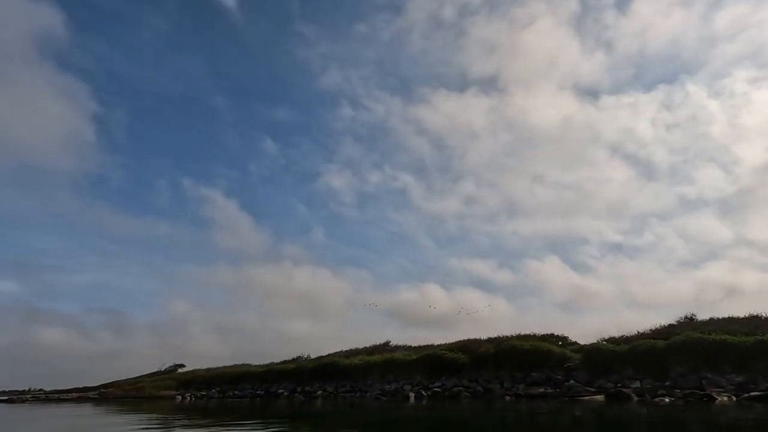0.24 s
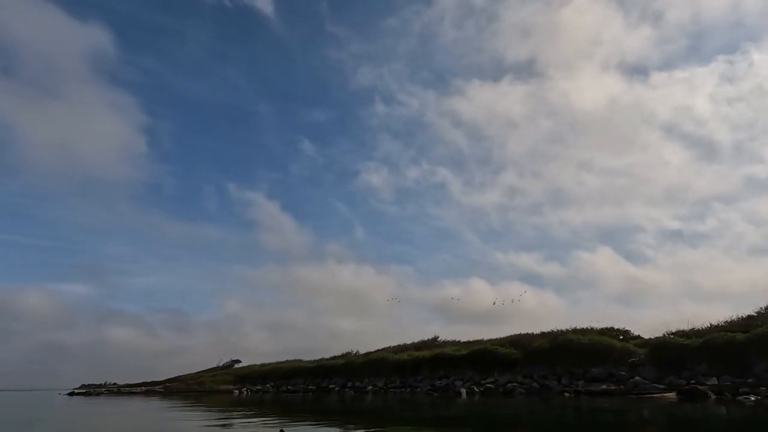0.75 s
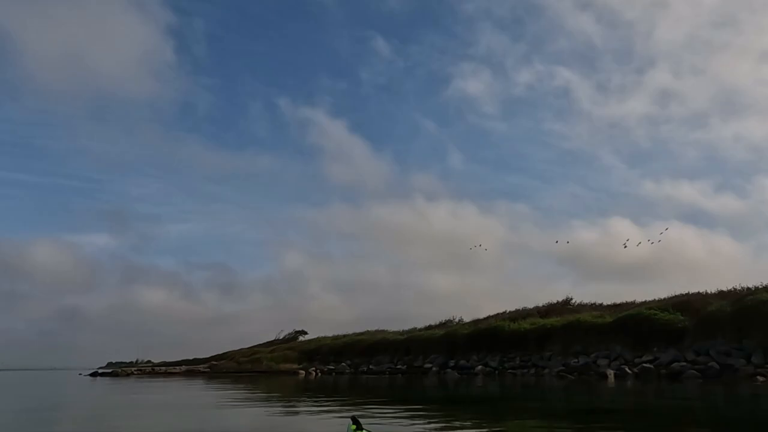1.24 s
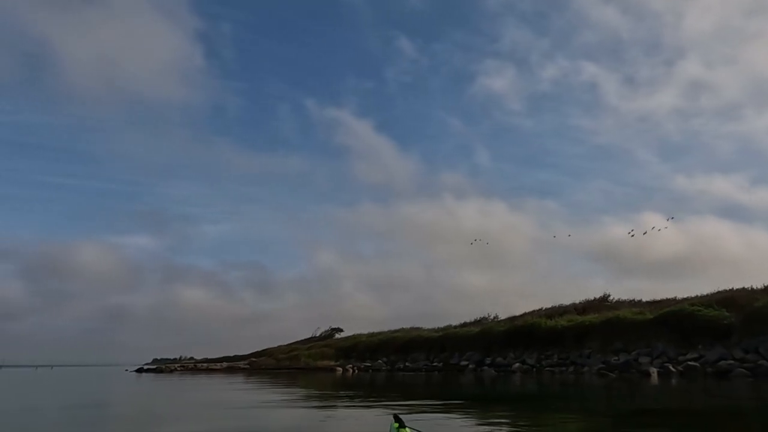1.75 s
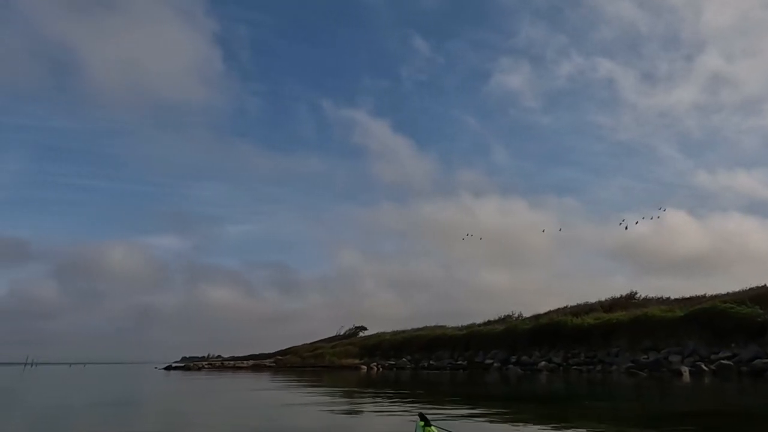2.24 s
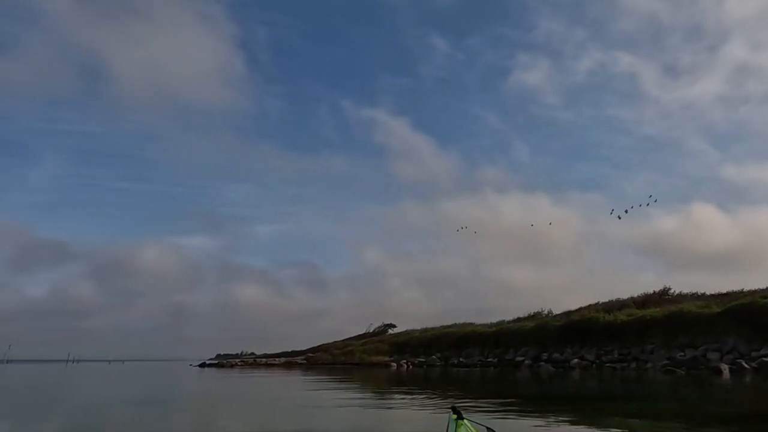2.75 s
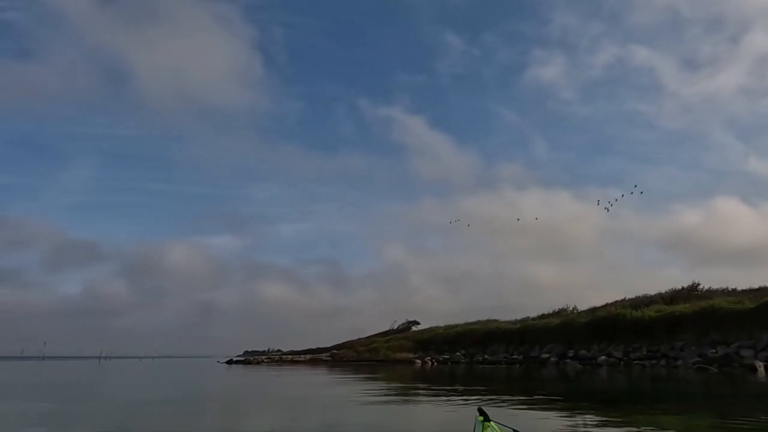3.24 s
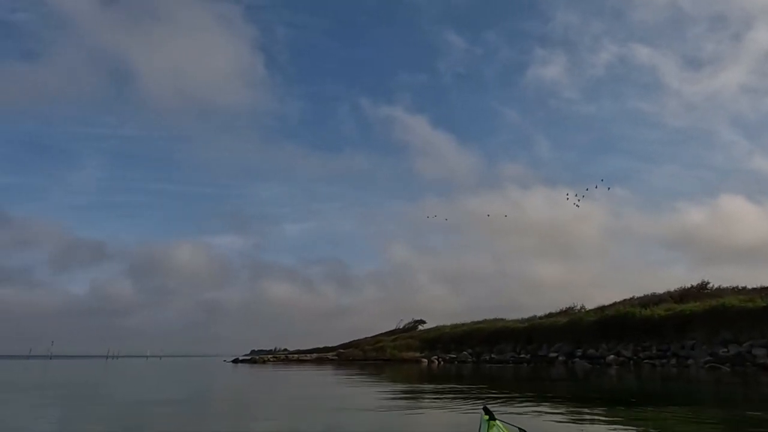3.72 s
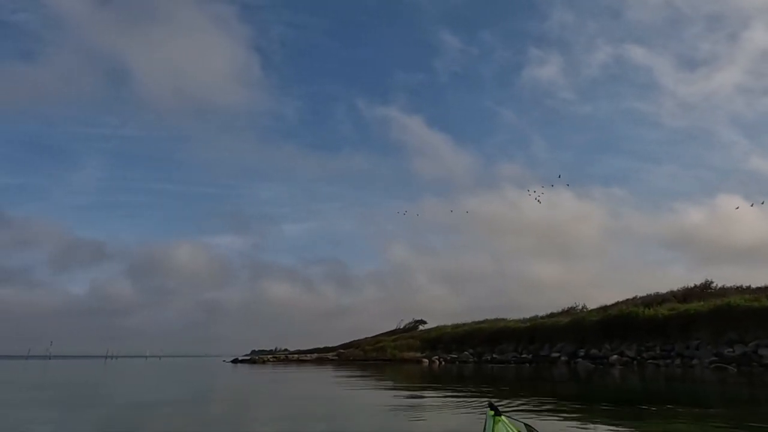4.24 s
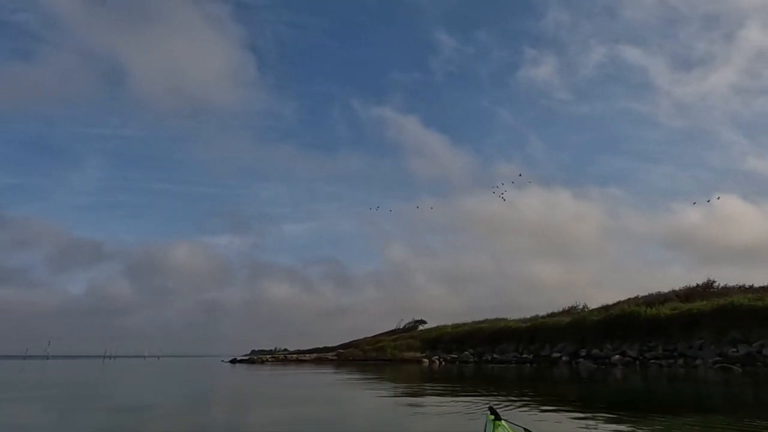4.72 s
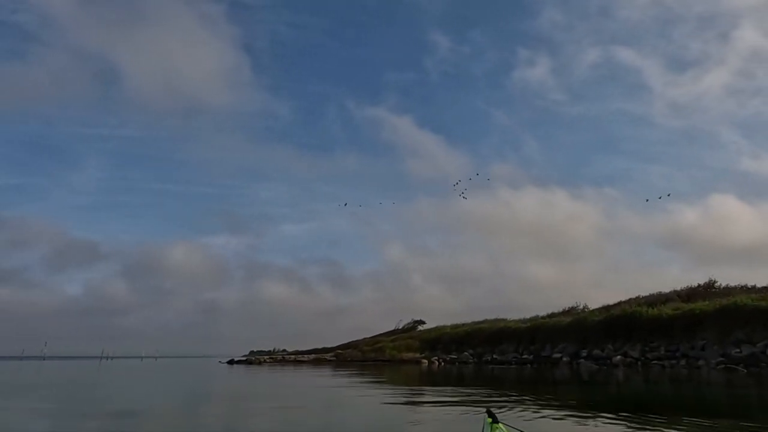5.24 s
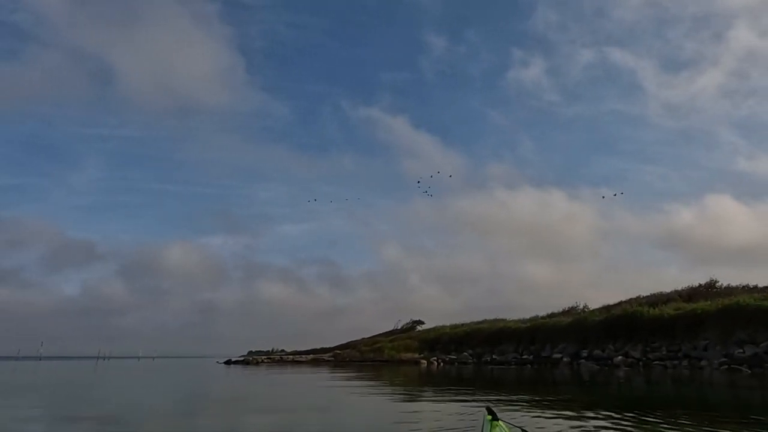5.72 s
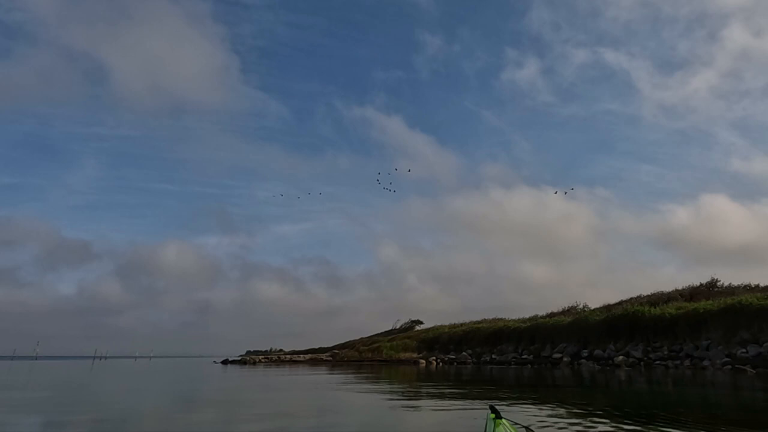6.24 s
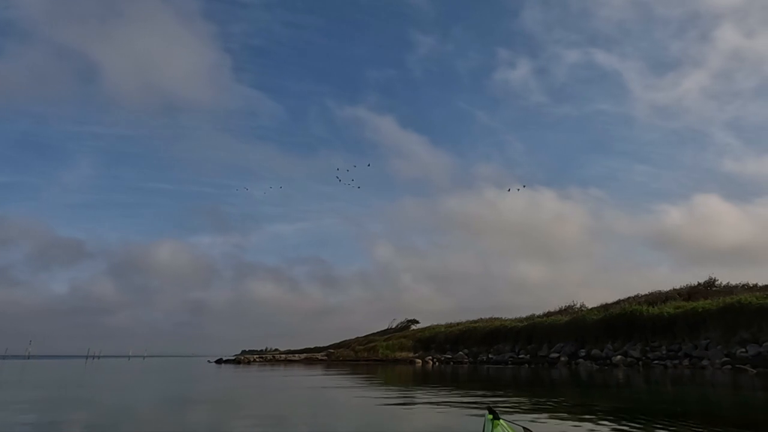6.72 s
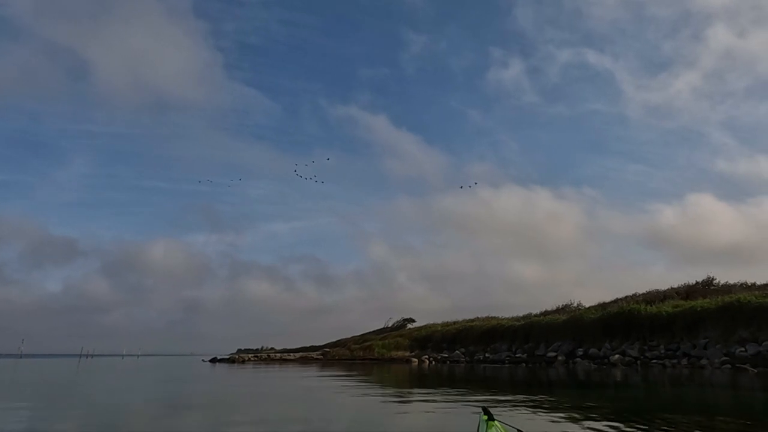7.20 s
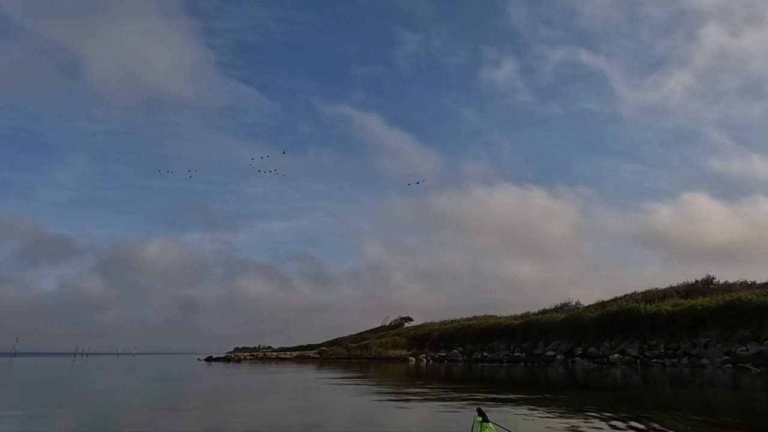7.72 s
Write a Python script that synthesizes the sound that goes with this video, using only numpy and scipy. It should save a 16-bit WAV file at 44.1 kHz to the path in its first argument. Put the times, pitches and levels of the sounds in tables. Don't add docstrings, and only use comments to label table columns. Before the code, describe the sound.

Outdoors on calm water by a low bank, a flock of geese flies past, giving short hoarse honks and higher yelps ahead and to the left over a blurred distant chorus. Heavy wind thumps hit the stereo microphone in the first second, then ease to soft rumbling. Calls come in uneven clusters. Late on, nearby cloth rubs, small gear ticks, and another strong gust arrives.

```python
import sys
import numpy as np
from scipy import signal
from scipy.fft import rfft, irfft, next_fast_len
from scipy.io import wavfile
from scipy.ndimage import uniform_filter1d

SR = 44100
rng = np.random.default_rng(int(sys.argv[2]) if len(sys.argv) > 2 else 0)


def put_to_file(sound):
    columns = np.atleast_2d(sound).T
    safe = np.clip(columns, -1, 1)
    whole_steps = np.round(safe * 32767)
    wavfile.write(sys.argv[1], SR, whole_steps.astype(np.int16))


def invert_db(x):
    u = np.asarray(x, float) / 20
    return 10 ** u


N = 351036

# [Hz, dB per Hz]
AIR_SPECTRUM = [(40, -18), (70, -4.5), (110, -6), (210, -1), (330, -11), (550, -22), (1000, -10),
                (2500, -25.5), (4200, -30), (7600, -39), (8200, -50), (11000, -52.5), (15000, -73.5)]
# [Hz, 0-1]
AIR_COHERENCE = [(60, 1), (250, 0.93), (500, 0.61), (1000, 0.19), (4000, 0.22), (8000, 0.17)]
AIR_DB = -56
DRONE_HZ, DRONE_WIDTH_HZ, DRONE_DB = 192, 59, -61

# [s, dB, s, dB]
GUSTS = [(0.0, -30.5, 0.17, -5.5), (0.18, -29, 0.049, 7.5), (0.35, -26.5, 0.15, -16),
         (0.66, -34, 0.19, 1.5), (0.9, -36, 0.48, -11.5), (1.35, -41.5, 0.23, -7), (1.72, -32, 0.41, -11),
         (2.08, -35.5, 0.22, -10.5), (2.75, -39, 0.25, -18), (3.3, -51, 1, -10), (3.88, -37.5, 0.088, -5),
         (4.97, -36, 0.31, -4), (5.56, -37.5, 0.14, -8), (5.95, -47, 0.96, -11), (6.42, -34.5, 0.15, -12),
         (6.65, -51, 0.13, 9.5), (7.35, -44, 0.38, -5), (7.71, -25, 0.13, -13.5), (7.87, -37.5, 0.17, -27)]
# [s, dB, Hz, dB, s]
SLAPS = [(0.156, -10.5, 77.4, -5, 0.014), (0.171, -23, 99.6, -7, 0.015), (0.224, -19.5, 147, -4, 0.023),
         (0.256, -30.5, 98.5, -26, 0.012), (0.587, -22, 210, -10, 0.039), (0.611, -17, 197, -8.5, 0.035),
         (0.646, -13, 99.6, 1.5, 0.03), (0.648, -28, 300, -7, 0.0094), (0.716, -18.5, 254, -8.5, 0.014),
         (0.16, -26, 254, -8, 0.012), (0.666, -31, 109, -14, 0.041), (0.715, -10.5, 111, 0, 0.021),
         (0.726, -11.5, 100, -1, 0.027), (1.23, -43.5, 94.2, -9, 0.045), (4.948, -30.5, 88, -9, 0.035),
         (6.324, -27.5, 99, 0, 0.023), (5.549, -37, 72.7, -4, 0.026), (7.715, -20.5, 61.5, 10.5, 0.033),
         (7.779, -32, 102, -7, 0.034), (7.69, -34, 128, -1, 0.023), (5.535, -31, 60, 0, 0.012),
         (3.87, -33, 45, -3, 0.039), (6.27, -41.5, 243, -12, 0.021), (7.86, -22, 73, -8.5, 0.032)]
LULL_DB, LULL_FLUTTER_DB = -54.5, -64
GUST_FLANK_DB = 12.5

# [s, s, dB]
RUBS = [(0.02, 0.051, -62.5), (0.665, 0.4, -63), (7.287, 0.54, -68), (.24, 0.093, -63), (0.351, 0.11, -58),
        (0.553, 0.048, -56.5), (4.75, 0.27, -65.5), (6.69, 0.11, -57), (6.872, 0.11, -60.5),
        (7.013, 0.12, -45.5), (7.176, 0.075, -63)]
# [Hz, dB per Hz]
CLOTH_SPECTRUM = [(100, -18.5), (200, 1.5), (600, -11.5), (1500, -16), (4000, -15), (7600, -20),
                  (8400, -27.5), (12000, -37), (15000, -52)]
# [s, dB, Hz]
TICKS = [(1.1344, -69, 5230), (3.429, -61, 5900), (6.545, -47, 3870), (6.575, -48.5, 7200),
         (6.5904, -44, 5520), (6.6847, -53, 5840), (6.8893, -58, 6030), (7.19, -54, 6000),
         (7.4694, -57, 6560), (7.9229, -51.5, 6470), (7.9444, -59, 5280)]
RUB_ATTACK_DB_PER_S, RUB_SAG_DB_PER_S, RUB_RELEASE_DB_PER_S = 894, 6, 501

# [s, dB]
CHORUS_LEVEL = [(0.0, -46), (0.22, -43.5), (0.82, -48.5), (1.09, -60), (1.62, -48.5), (2.22, -53),
                (3.97, -53), (4.3, -56), (4.75, -50.5), (5.25, -57), (5.52, -55.5), (6.15, -48.5),
                (6.36, -56), (6.47, -68.5), (7.21, -49.5), (7.5, -57.5), (7.96, -63)]
# [Hz, dB]
CHORUS_SPECTRUM = [(700, -15.5), (980, 1.5), (1500, 0), (1900, -6), (2500, -7), (3400, 3), (5000, -12),
                   (8000, -17)]

# start t/s, length/s, level/dB, pitch f/Hz, windpipe resonance spacing f/Hz [s, s, dB, Hz, Hz]
LEFT_HONKS = [(0.1, 0.24, -44.5, 222.7, 1360), (1.43, 0.14, -48.5, 222.3, 1320),
              (1.87, 0.17, -59.5, 223, 1210), (2.12, 0.19, -51.5, 228, 1303),
              (2.55, 0.12, -44.5, 220, 1253), (2.75, 0.14, -53.5, 236.5, 1160),
              (3.2, 0.093, -50.5, 211, 1110), (3.3, 0.095, -46.5, 206, 1137),
              (3.48, 0.093, -51, 209.5, 1145), (3.6, 0.062, -58, 287, 1060), (4.45, 0.4, -54, 233, 1310),
              (5.55, .15, -48, 198, 1160), (5.8, 0.16, -47.5, 206.5, 1410), (6.33, 0.064, -53, 209, 1130),
              (6.88, 0.065, -55.5, 210, 1230), (7.35, .05, -51, 215, 1180), (7.5, 0.11, -50, 229, 1210),
              (7.66, .1, -50, 223, 1174), (7.81, 0.11, -54.5, 215.4, 1244)]
LEFT_YELPS = [(6.205, .07, -46, 1420, 1420), (6.05, .07, -50, 1480, 1480), (0.83, 0.047, -40.5, 1390, 1350),
              (0.89, 0.058, -43, 1506, 1480), (3.0, 0.066, -43.5, 1450, 1500), (1.65, 0.12, -54, 845, 1650),
              (7.385, .1, -53, 790, 1560), (2.97, 0.1, -46, 680, 1430), (3.78, .14, -42.5, 1060, 1180),
              (3.96, 0.081, -49.5, 1050, 1150), (6.57, 0.085, -41.5, 1030, 1030),
              (5.55, .15, -47, 995, 1100), (5.8, .155, -47, 1035, 1035), (1.55, .09, -50, 1500, 1640),
              (2.12, 0.17, -55, 1740, 1720), (6.7, 0.1, -58, 775, 1360)]
RASPS = [(0.15, .05, -57, 225, 1150), (5.825, .125, -60, 200, 1500), (0.081, 0.044, -40, 205.2, 1240),
         (0.24, 0.069, -51, 217.4, 1270), (0.362, 0.026, -45, 229, 1220), (0.817, 0.051, -48, 223.4, 1520),
         (0.88, 0.11, -52.5, 225, 1520), (1.5, 0.085, -61, 213.4, 1130), (1.56, 0.13, -58.5, 226, 1470),
         (1.712, 0.053, -56, 221, 1075), (2.455, 0.11, -53.5, 222, 1175), (2.962, .045, -56, 221.5, 1700),
         (3.783, 0.075, -57, 253, 1150), (3.97, 0.11, -50, 237, 1200), (4.08, 0.053, -56.5, 205, 1030),
         (6.547, 0.04, -52, 203.2, 1136), (6.66, 0.03, -51, 228, 1100)]
HONKS = [(3.0, 0.12, -61, 362, 1430), (3.11, 0.04, -52, 254, 1050), (3.606, 0.046, -49.5, 276, 1143),
         (3.955, 0.13, -50.5, 261.1, 1070), (6.134, 0.075, -45, 219, 1225),
         (6.578, 0.077, -48.5, 205, 1095), (7.245, 0.06, -47.5, 250, 1037)]
SLIDES = [
    (5.328, 0.115, -46, 222, 1170),
    (3.96, .125, -57, 1125, 1690),
]
YELPS = [(0.186, 0.118, -56, 900, 1135), (0.388, 0.052, -55, 892, 1190), (0.56, 0.11, -72, 1038, 1000),
         (3.64, 0.046, -52, 396, 1170), (6.095, 0.025, -55, 735, 1194)]
MUTTERS = [(2.22, 0.12, -60.5, 233.7, 1200), (2.58, 0.21, -60, 230.3, 1375), (4.2, 0.097, -59, 209, 1350),
           (4.82, 0.033, -55.5, 241, 1210)]
FAR_HONKS = [(2.97, 0.081, -49, 222, 1200), (6.548, 0.03, -50, 203.5, 1050), (7.1, 0.084, -50.5, 212, 1200),
             (7.18, 0.081, -52.5, 211.6, 1127)]
FAR_YELPS = [
    (3.063, .048, -46, 830, 1385),
    (3.96, .125, -56, 1045, 2090),
]
BURRS = [
    (5.44, .03, -56, 200, 1230),
]
FALLS = [(3.9, 0.057, -56, 843, 1290), (4.088, .06, -57.5, 1030, 1540), (4.843, .045, -53.5, 746, 744),
         (4.95, .095, -55.5, 804, 813), (5.04, .11, -58, 781, 784), (5.15, 0.047, -69, 1080, 1590),
         (5.96, 0.051, -66, 1106, 1640)]
PINCHED = [(0.94, .118, -53, 231.3, 1157), (3.042, .035, -54, 240, 1420), (5.822, .06, -51, 195, 1190),
           (6.047, .055, -49, 213.6, 1195), (6.255, .065, -53, 230, 1190), (6.32, .043, -55, 229, 1150),
           (6.19, .035, -54, 220, 1110)]
CLIMBS = [(2.965, .042, -48, 230, 1240), (5.875, .08, -51, 205, 1210), (6.205, .05, -49, 245, 1300),
          (7.17, .035, -56, 230, 1380)]
DULL_SLIDES = [(5.435, .035, -51, 203, 1090), (7.098, .072, -52, 229, 1140), (7.193, .075, -48, 212, 1130),
               (6.245, .075, -47, 238, 1150)]
DROOPS = [
    (1.43, .055, -61, 1000, 1470),
    (5.43, .158, -57, 208, 1450),
]
TORN = [
    (3.84, .085, -47, 250, 1150),
    (3.9, .07, -52, 240, 1260),
]
SHRILL = [
    (4.04, .087, -59, 1025, 1360),
    (3.83, .045, -57, 1040, 1400),
]

RASP, HONK, SLIDE, YELP = (.5, .03, .05, .42), (.07, .015, .02, .42), (.04, .05, .115, .48), (.045, .005, .095, .12)
MUTTER, LEFT, LEFT_YELP = (.4, .05, .05, .42), (.09, .025, .025, .42), (.06, .012, .04, .42)
BURR, FALL = (.25, .025, .035, .42), (.02, -.032, .04, .42)
PINCH, CLIMB, DULL_SLIDE = (.2, .03, .03, .4), (.22, .07, .01, .85), (.06, .03, .08, .2)
DROOP, TEAR, SHRIEK = (.05, .03, .11, .55), (.7, .02, .2, .15), (.06, .01, .05, .25)
# brightest f/Hz, level change over the call/dB, fall-off below and above the brightest f/dB
RASP_VOICE, HONK_VOICE, SLIDE_VOICE = (4640, 1.8, 2.35, 31), (3301, -2.5, 6, 28), (2550, -6, 16, 44)
YELP_VOICE, MUTTER_VOICE, FAR_VOICE = (4296, -6, 11.5, 31), (2478, -5, 14, 19.5), (1600, 8.5, 0.84, 20)
FAR_YELP_VOICE, LEFT_VOICE, LEFT_YELP_VOICE = (2600, 1, 2.5, 29), (1687, 0.5, -4.5, 31), (1397, 5.5, -7, 37)
BURR_VOICE, FALL_VOICE = (3500, 0.1, 12, 42), (2302, 0, 1.5, 46)
PINCH_VOICE, CLIMB_VOICE, DULL_VOICE = (3550, -1.5, 36, 90), (3100, 1.5, 14, 50), (2250, -3, 20, 70)
DROOP_VOICE, TEAR_VOICE, SHRIEK_VOICE = (2900, -3, 50, 80), (4000, -3, 12, 30), (4100, -3, 50, 60)
WAVER_DB, WAVER_SHARE = 2.3, .004


def evened(x):
    return x / np.sqrt(np.mean(x ** 2) + 1e-20)


def read(points, hz):
    f, value = np.transpose(points)
    return np.interp(np.log(hz + 1), np.log(f + 1), value)


def along(rows, column):
    rows = np.array(rows)
    return np.interp(np.arange(N) / SR, rows[:, 0], rows[:, column])


def add(mix, s, sound):
    part = mix[..., max(round(s * SR), 0):][..., :sound.shape[-1]]
    part += sound[..., :part.shape[-1]]


def coloured(x, gain):
    size = next_fast_len(x.shape[-1])
    spectrum = rfft(x, size) * gain(np.fft.rfftfreq(size, 1 / SR))
    return irfft(spectrum, size)[..., :x.shape[-1]]


def pair(same):
    size = next_fast_len(N)
    a, b = rfft(rng.standard_normal((2, N)), size)
    alike = np.clip(same(np.fft.rfftfreq(size, 1 / SR)), -1, 1)
    return irfft(np.array([a, alike * a + np.sqrt(1 - alike ** 2) * b]), size)[:, :N]


def air():
    wash = coloured(pair(lambda hz: read(AIR_COHERENCE, hz)), lambda hz: invert_db(read(AIR_SPECTRUM, hz)))
    drone = coloured(pair(lambda hz: 1 + 0 * hz),
                     lambda hz: 1 / (1 + (2 * (hz - DRONE_HZ) / DRONE_WIDTH_HZ) ** 2))
    return invert_db(AIR_DB) * evened(wash) + invert_db(DRONE_DB) * evened(drone)


def gusts():
    s, db, width, flutter_db = np.array(GUSTS).T[:, :, None]
    t = np.arange(0, N + 64, 64) / SR
    swell = invert_db(2 * (db - GUST_FLANK_DB * abs((t - s) / width) ** 1.15))
    buffet_power = invert_db(2 * LULL_DB) + swell.sum(0)
    flutter_power = invert_db(2 * LULL_FLUTTER_DB) + (swell * invert_db(2 * flutter_db)).sum(0)
    return [np.interp(np.arange(N) / SR, t, np.sqrt(p)) for p in (buffet_power, flutter_power)]


def slap(peak_db, hz, pan_db, long):
    t = np.arange(0, 3 * abs(long), 1 / SR) / abs(long)
    knock = rng.standard_normal((2, SR // 4))[:, :len(t)] * t * np.exp(-3.5 * t)
    knock = coloured(knock, lambda f: (f / hz) ** 2 / (1 + (f / hz) ** 5))
    knock *= signal.windows.tukey(len(t), .3)
    knock /= abs(knock).max(axis=1)[:, None]
    return knock * invert_db(peak_db - 2.0 + np.array([[pan_db], [-pan_db]]) / 2)


def wind():
    slow = coloured(pair(lambda hz: 0.83 + 0 * hz), lambda hz: (hz / 28) ** 2 / (1 + (hz / 31) ** 5))
    flutter = coloured(pair(lambda hz: .5 + 0 * hz), lambda hz: (hz / 65) ** 3 / (1 + (hz / 92) ** 6.5))
    flutter *= invert_db(4.0 * evened(uniform_filter1d(rng.standard_normal(N), 2500)))
    buffet_gain, flutter_gain = gusts()
    out = evened(slow) * buffet_gain * invert_db([[-.6], [1.8]]) + evened(flutter) * flutter_gain * invert_db(-6.0)
    for s, peak_db, hz, pan_db, long in SLAPS:
        add(out, s - .005, slap(peak_db, hz, pan_db, long))
    return out


def rubs():
    t, gain = np.arange(0, N + 32, 32) / SR, 0
    for s, long, db in RUBS:
        late = t - s
        attack_db = RUB_ATTACK_DB_PER_S * np.minimum(late, 0)
        sag_db = RUB_SAG_DB_PER_S * np.maximum(late, 0)
        release_db = RUB_RELEASE_DB_PER_S * np.maximum(late - long, 0)
        gain += invert_db(db + attack_db - sag_db - release_db)
    return np.interp(np.arange(N) / SR, t, gain)


def tick(peak_db, hz):
    t = np.arange(500) / SR
    noise = coloured(rng.standard_normal(500), lambda f: (f / hz) ** 3 / (1 + (f / (1.13 * hz)) ** 8))
    snap = 0.86 * noise + 0.64 * np.sin(2 * np.pi * hz * t)
    return np.ones((2, 1)) * invert_db(peak_db + 3.5 - 60 * t / 0.012) * snap


def gear():
    grains = pair(lambda hz: 0.8 - 0.65 / (1 + (9500 / (hz + 1)) ** 6))
    grains *= invert_db(2.2 * evened(uniform_filter1d(rng.standard_normal(N), 90)))
    hiss = evened(coloured(grains, lambda hz: invert_db(read(CLOTH_SPECTRUM, hz))))
    out = hiss * rubs()
    for s, peak_db, hz in TICKS:
        add(out, s, tick(peak_db, hz))
    return out * invert_db([[.3], [-.3]])


def shore(x, t60=0.24):
    t = np.arange(SR // 2) / SR
    signs = rng.choice([-1., 1.], (2, len(t)))
    taps = signs * (rng.random((2, len(t))) < .04) * invert_db(-60 * t / t60)
    return signal.fftconvolve(x[None], taps / np.linalg.norm(taps[0]), axes=1)[:, :N]


def chorus(count=125):
    mix, ends = np.zeros((2, N)), signal.windows.tukey(N, .002)
    for k, (late, long, high, kind, neck, loud) in enumerate(rng.random((count, 6))):
        s = (k + late) * N / SR / count - .1
        hz = (190 + 60 * high) * (1.2 if loud < .2 else 1)
        long = .06 + .11 * long
        arch = [(s, .95 * hz), (s + .3 * long, hz), (s + long, (.93 - .08 * kind) * hz)]
        effort = (9.0 * loud, 9.0 * loud - 4, 1900)
        add(mix[k % 2], s, honk(effort, (950 + 640 * neck ** 1.3, .1), *arch))
    mix = np.array([mix[0] + 0.2 * mix[1], mix[1] - 0.26 * mix[0]])
    mix = (mix + invert_db(-2.0) * shore(mix[0], t60=1.0)) * ends
    mix = coloured(mix, lambda hz: invert_db(read(CHORUS_SPECTRUM, hz)))
    mix /= np.sqrt(uniform_filter1d(mix ** 2, 9000, axis=1) + 1e-12)
    return mix * invert_db(along(CHORUS_LEVEL, 1) + np.array([[5.5], [-.5]]))


def honk(effort, voice, *rows, slope_db=-4, below_db=4.5, above_db=26):
    (start_db, end_db, bright_hz), (pipe_hz, hoarse) = effort, voice
    s, pitch = np.transpose(rows)
    t = np.arange(s[0], s[-1] + .008, 1 / SR)
    hz = uniform_filter1d(np.interp(t, s, pitch), 500, mode="nearest")
    shake, puff, luck = rng.standard_normal((3, len(t)))
    waver = evened(uniform_filter1d(uniform_filter1d(luck, 500), 500))
    jitter = .13 * hoarse * evened(uniform_filter1d(shake, 200))
    turns = np.cumsum(hz * (1 + WAVER_SHARE * waver + jitter)) / SR

    top = 2 * int(12000 / hz.max()) + 1
    phase = (turns + .5) % 1 - .5
    pulses = np.sinc(top * phase) / np.sinc(phase)
    pulses *= invert_db(3 * hoarse * luck[(turns + .5).astype(int)])
    puffs = puff * np.exp(-(turns % 1) / .5)
    drive = evened(pulses) + 1.2 * hoarse * evened(puffs)

    f, frame_s, z = signal.stft(drive, SR, nperseg=512, noverlap=384)
    neck_hz = pipe_hz * (np.interp(s[0] + frame_s, t, hz) / hz.mean()) ** .8
    f = f[:, None] + 1
    echo = .62 * (1 - .65 * hoarse) / (1 + (f / 8000) ** 2)
    pipe = 1 / (1 - echo * np.exp(-2j * np.pi * f / neck_hz)) ** 2
    octaves = np.log2(f / bright_hz)
    bend_db = np.where(octaves < 0, below_db, above_db) * octaves ** 2 / (1 + 1.07 * abs(octaves))
    beak_db = slope_db * np.log2(f / 1000) - bend_db
    z *= pipe * invert_db(beak_db) / (1 + (790 / f) ** 11) / (1 + (f / 8000) ** 6)
    sound = signal.istft(z, SR, nperseg=512, noverlap=384)[1][:len(t)]

    edge = np.minimum(np.minimum((t - t[0]) / (.006 + .02 * hoarse), (t[-1] - t) / .026), 1)
    return invert_db(np.linspace(start_db, end_db, len(t)) + WAVER_DB * waver) * evened(sound) * edge


def flock(kinds, gain_db):
    mix = np.zeros(N)
    for table, (bright_hz, fade_db, thin_db, dull_db), (hoarse, scoop, sag, turn) in kinds:
        for s, long, db, hz, pipe_hz in table:
            u = np.linspace(0, 1, num=9)
            rise, fall = scoop * (1 - u / turn) ** 2, sag * ((u - turn) / (1 - turn)) ** 2
            arch = zip(s + u * long, hz * (1 - np.where(u < turn, rise, fall)))
            effort = (db - fade_db / 2, db + fade_db / 2, bright_hz)
            call = honk(effort, (pipe_hz, hoarse), *arch, below_db=thin_db, above_db=dull_db)
            add(mix, s, invert_db(gain_db) * call)
    return mix


def geese_left():
    return flock([(LEFT_HONKS, LEFT_VOICE, LEFT), (LEFT_YELPS, LEFT_YELP_VOICE, LEFT_YELP)], gain_db=2.0)


def geese_ahead():
    return flock([(RASPS, RASP_VOICE, RASP), (HONKS, HONK_VOICE, HONK), (SLIDES, SLIDE_VOICE, SLIDE),
                  (YELPS, YELP_VOICE, YELP), (MUTTERS, MUTTER_VOICE, MUTTER), (FAR_HONKS, FAR_VOICE, HONK),
                  (FAR_YELPS, FAR_YELP_VOICE, SHRIEK), (BURRS, BURR_VOICE, BURR), (FALLS, FALL_VOICE, FALL),
                  (PINCHED, PINCH_VOICE, PINCH), (CLIMBS, CLIMB_VOICE, CLIMB),
                  (DULL_SLIDES, DULL_VOICE, DULL_SLIDE), (DROOPS, DROOP_VOICE, DROOP),
                  (TORN, TEAR_VOICE, TEAR), (SHRILL, SHRIEK_VOICE, SHRIEK)], gain_db=1.0)


def scene():
    around = air() + wind() + gear() + chorus()
    left = geese_left()
    ahead = geese_ahead()
    echoes = invert_db(-10) * shore(ahead + left)
    ahead_pair = np.array([np.roll(ahead, 1), ahead]) * invert_db([[-.4], [.4]])
    left_pair = left * np.array([[1], [-.1]])
    return ahead_pair + left_pair + echoes + around


def low_pass(x):
    return signal.sosfilt(signal.butter(12, 15050, fs=SR, output="sos"), x)


def record(dry):
    return low_pass(dry)


dry = scene()
out = record(dry)
put_to_file(out)
```